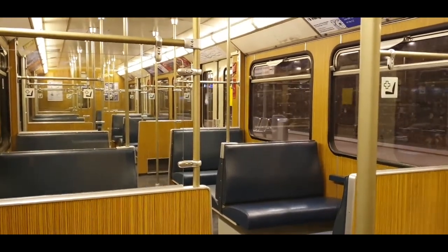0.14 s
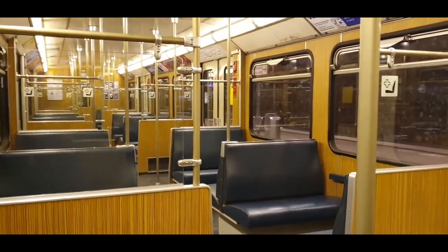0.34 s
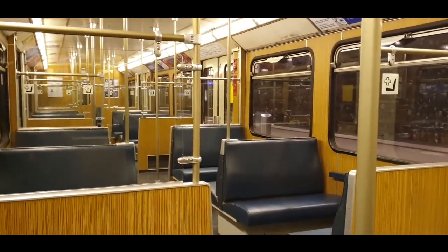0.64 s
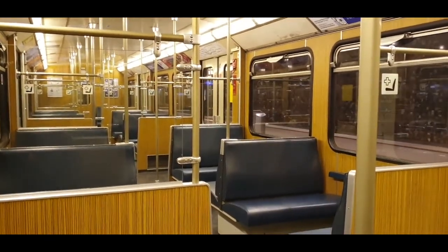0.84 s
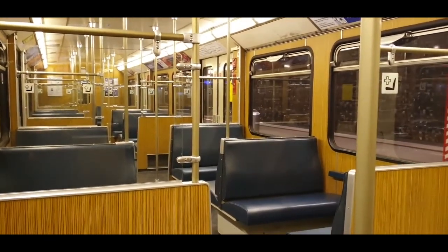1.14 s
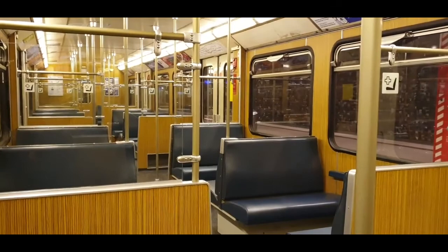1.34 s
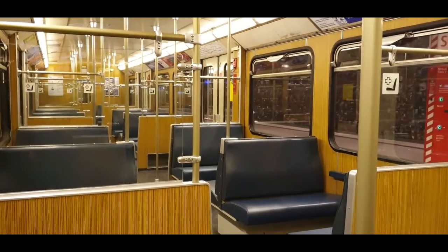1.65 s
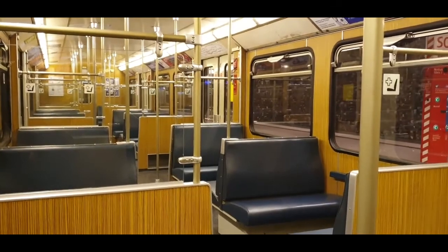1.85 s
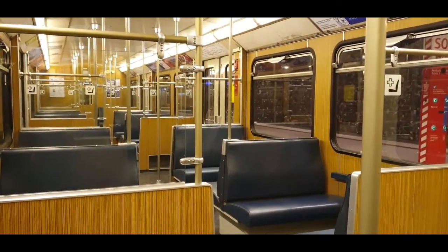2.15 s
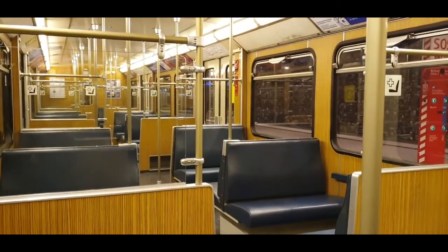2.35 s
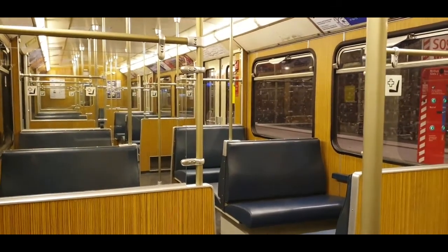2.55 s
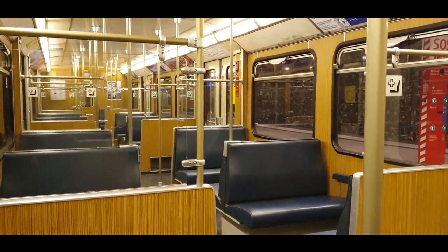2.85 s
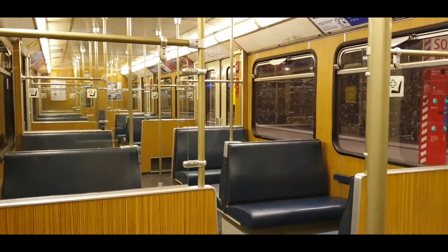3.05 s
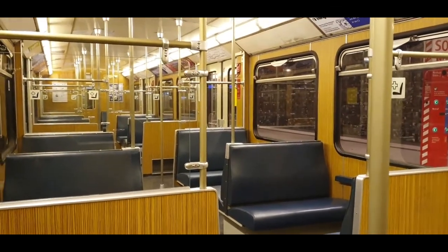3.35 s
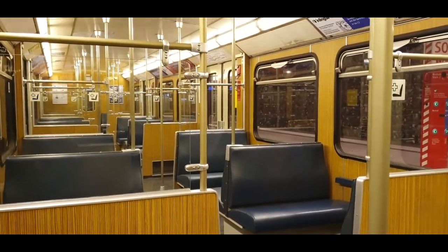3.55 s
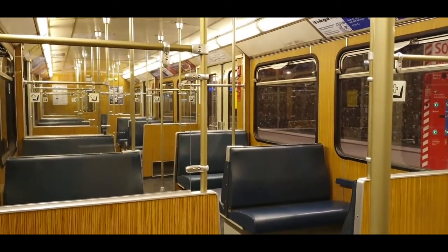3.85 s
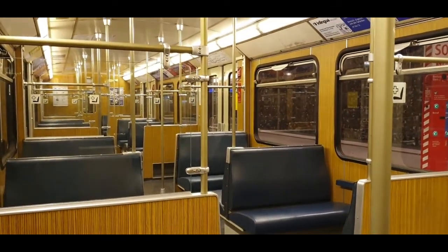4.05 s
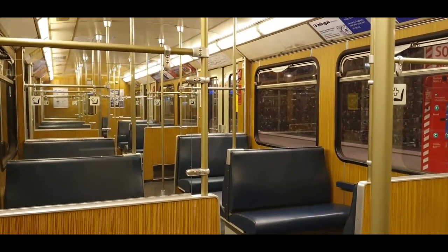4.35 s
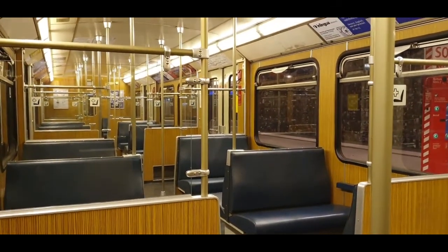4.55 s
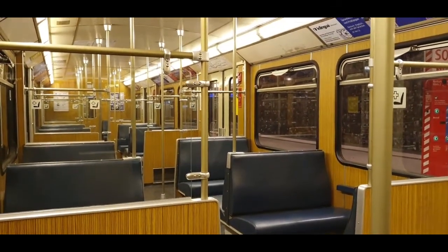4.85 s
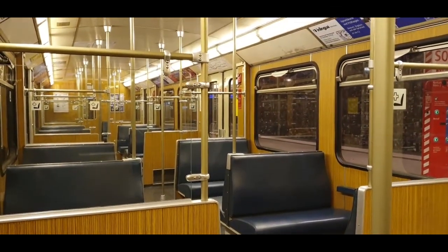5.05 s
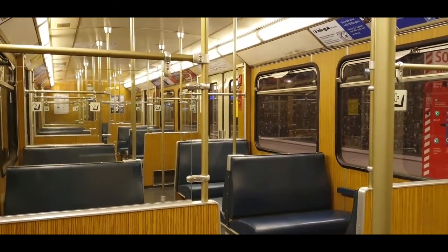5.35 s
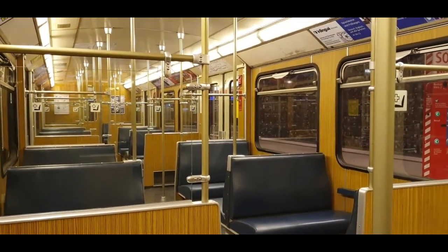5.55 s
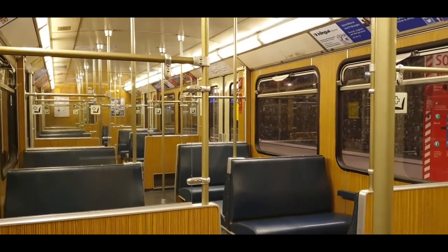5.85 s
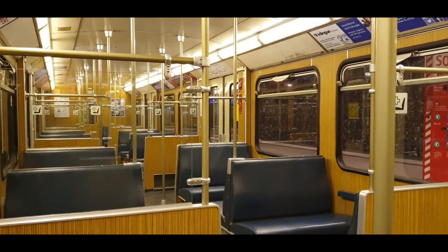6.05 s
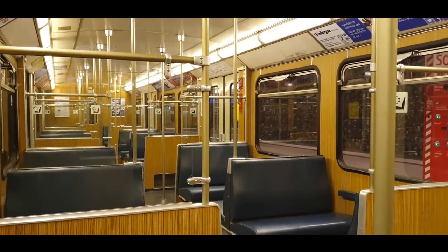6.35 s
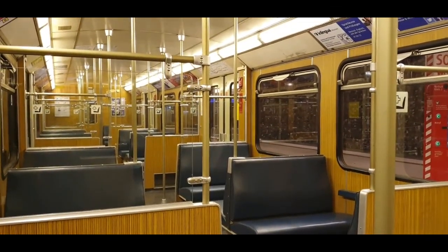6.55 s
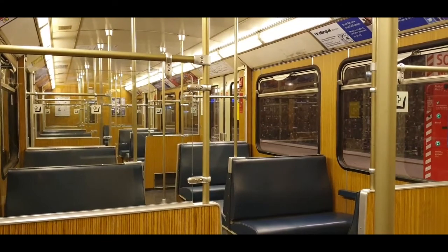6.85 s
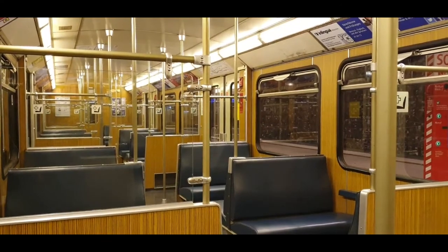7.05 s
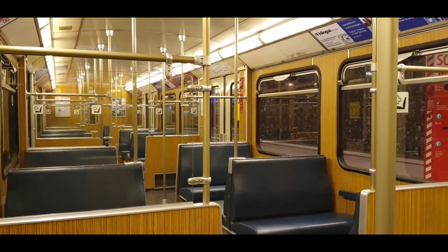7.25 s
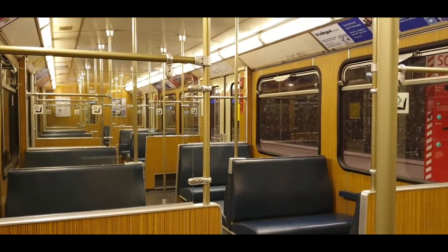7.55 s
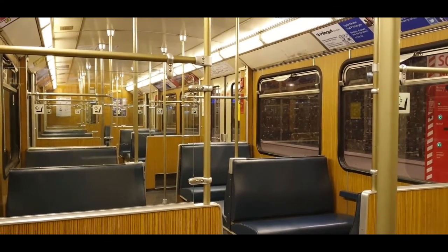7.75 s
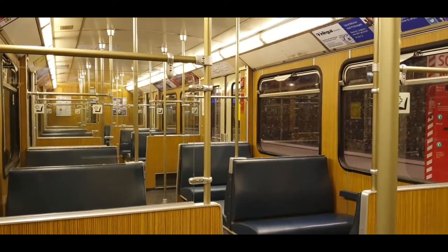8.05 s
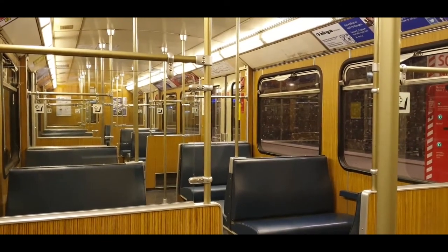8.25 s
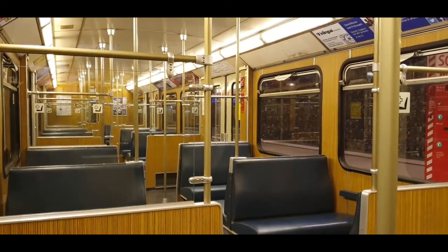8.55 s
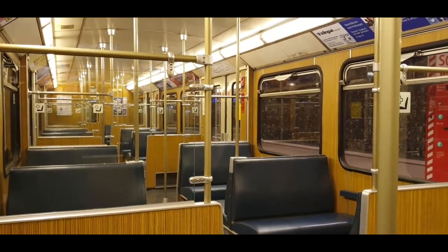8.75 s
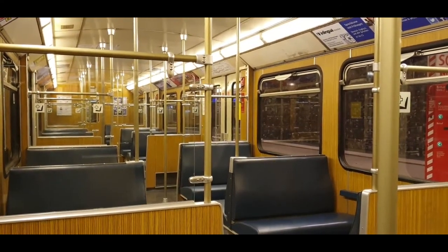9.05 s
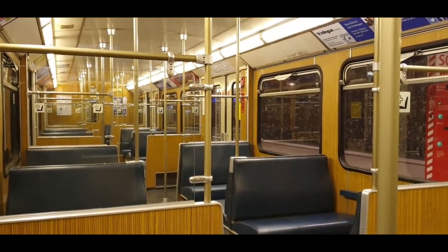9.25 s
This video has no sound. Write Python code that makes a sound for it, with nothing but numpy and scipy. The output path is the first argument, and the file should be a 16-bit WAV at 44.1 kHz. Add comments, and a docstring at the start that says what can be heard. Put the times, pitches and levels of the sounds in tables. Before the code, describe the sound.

Close stereo interior of a train car stopping: low body thuds and brief valve puffs, then a high steady brake squeal with a fainter wandering one above. A loud, short release of compressed air with hard knocks ends the squeal. Afterwards only the nearly constant electric hum remains, briefly subdued, joined midway by airy duct hiss and at the very end by a soft puff of air.

```python
"""Inside a metro car at the end of its creep to a halt: shaft orders and fan tones hum over a filtered-noise wash.
Bumps (noise bands), short brake notes (sines) and valve puffs (noise bursts) start within the first fifth of
a second; wavering squeals follow. At 2.1 s the brake air, dulling noise, blows off amid knocks and a clunk.
Gain control ducks loud moments and recovers late. A faint clunk comes at 3.8 s, the duct hiss, quiet since 1.5 s,
is back by 5.4 s, and a last puff comes at 9.3 s. Two unlike microphone ports hear it all."""
import sys
import numpy as np
from scipy import signal
from scipy.fft import rfft, irfft, next_fast_len
from scipy.io import wavfile
from scipy.ndimage import uniform_filter1d, minimum_filter1d

SR = 44100
rng = np.random.default_rng(int(sys.argv[2]) if len(sys.argv) > 2 else 0)


def voltage_ratio(decibels):
    """Convert decibels (scalar or array-like) to amplitude ratios, 20 dB per decade."""
    exponent = np.asarray(decibels, float) / 20
    return 10 ** exponent


def output_pcm(signal):
    """Save a mono or channel-first signal as 16-bit PCM at the path in sys.argv[1].

    Samples are clipped to [-1, 1] before scaling.
    """
    pcm = np.clip(np.atleast_2d(signal).T, -1, 1) * 32767
    wavfile.write(sys.argv[1], SR, np.round(pcm).astype(np.int16))


N = 414099
T = np.arange(N) / SR  # s

# Sixth order of the motor shaft: t/s, f/Hz
SIXTH_ORDER = [(0, 166.2), (3.7, 166.9), (5.2, 166.9), (6.0, 166.5), (6.7, 166.7), (7.2, 167.5),
               (8.3, 168.1), (9.4, 167.9)]
# Running levels, added to the source tables: t/s, motor level/dB, ventilation and rolling level/dB
RUNNING_LEVELS = [(0, 0.5, -1), (.6, 2, -.6), (1.5, 0.2, -3), (2.8, 2.5, 1), (4.0, 1.5, 0.1),
                  (5.2, 0.4, -0.6), (9.4, 0, 0)]
# Multiples of the shaft rate that are heard: order
SHAFT_ORDERS = [1, 2, 3, 4, 6, 7, 8, 9, 10, 11, 12, 13, 14, 18, 25, 26, 28]
# One row per order, levels as at 7 s: left level/dB, right level/dB, left lead/rad, waver/dB rms, growth/(dB/s)
ORDER_TONES = [(-57, -52, .1, -2, -0.5), (-51.5, -51.5, .2, 0.5, -2), (-36, -35, 0.25, 1.5, 0.34),
               (-45, -48.5, 0.24, 1, 0.4), (-34, -33.5, 0.19, 0.86, 0), (-56.5, -60, 0.75, -3.5, -0.5),
               (-55, -59, 0.71, -0.5, 2), (-76.5, -61.5, 0.58, 6, -1.5), (-54.5, -61, 0.97, 1.5, 2),
               (-55, -55.5, 0.93, 1.5, 2), (-59, -51.5, 1.9, 1, -1.03), (-48.5, -48, 0.2, 3, 1),
               (-66, -68, 0.75, 5.5, 4), (-70, -63, 0.83, 1, -1), (-67, -56, 3.2, 2, 0.4),
               (-69, -57, 1.1, 1, 0.5), (-83.5, -60, 4.5, 1, 1.5)]
# Change of orders 12 and 13 until the air is let off: order 12 level/dB, order 13 level/dB
BRAKED_ORDERS = (5.5, -5)
# Fan tones, levels as at 7 s: f/Hz, left level/dB, right level/dB, left lead/rad, waver/dB rms, growth/(dB/s)
FAN = [(51.1, -55, -49.5, .2, 5, 2.5), (103, -60, -54, .3, 4, 0), (152.5, -49, -52.5, 0.29, 3, 0),
       (287, -39.5, -48, 2.28, 2.5, 1.5), (373, -51, -51.5, 0.55, 2, 0.7)]
# Spectrum of the ventilation and rolling wash: f/Hz, level/(dB per Hz)
WASH_SPECTRUM = [(20, -97), (32, -86), (42, -61), (55, -53.5), (100, -61), (200, -67), (290, -66),
                 (330, -67), (372, -67.5), (430, -68.5), (550, -78), (800, -76), (1500, -77), (3000, -86),
                 (4000, -92), (7000, -100), (12000, -103), (16000, -114)]
# Fuzzy low resonance of the wash: f/Hz, width/Hz, level/dB
DRONE = (367, 38, -49.5)
# Faint whistle in the wash: f/Hz, width/Hz, level/dB
WHISTLE = (11350, 240, -75)
# Resonances of the hissing ducts: f/Hz, width/Hz, level/dB
DUCT_RESONANCES = [(5020, 550, -70), (5600, 4800, -72.5)]
# Duct hiss, loud, then quiet, then back, on top of its resonance levels: t/s, level/dB
HISS_LEVEL = [(0, 7), (.6, 1), (1.5, -27), (4.6, -27), (5.2, -5.5), (5.4, 10), (7.3, -2.5), (8.3, 2),
              (9.4, 2)]
# How alike the two ports hear the car: f/Hz, likeness/(0 to 1), left lead/rad
PORT_LIKENESS = [(60, 1, 0.4), (150, 1, 0.28), (304, 0.85, 0.31), (630, 0.6, 0.88), (1050, 0.19, 1.02),
                 (1450, 0.37, 3.77), (2286, 0.45, 5.8), (3040, 0, 15.9), (15000, 0.04, 10.4)]

# Bumps through the body: t/s, level/dB, hardness/(dB per octave)
BODY_BUMPS = [(.06, -31, -0.5), (.21, -28, 1), (.42, -30, -3), (.59, -27.5, 1), (.69, -26, 0),
              (.84, -29, -2.5), (.96, -26, -2), (1.04, -32, 0.5), (1.2, -42, -5), (1.39, -55, 6.5),
              (2.086, -24.5, 6.5), (2.14, -25, -2), (2.27, -24, 1.5), (2.35, -22.5, 3), (2.414, -21, 3),
              (2.445, -24, 1)]
# What the car body rings with: f/Hz, width/octaves, level/dB, rise/s, t60/s
BODY_BANDS = [(74, 0.39, -0.5, 0.03, 0.86), (144, 0.4, -4, 0.04, 0.37), (248, 0.29, -7.5, 0.022, 0.38),
              (468, 0.37, -14, .02, 0.48)]
# Short upper notes of the brake block, before each port's trim: t/s, level/dB
SHORT_NOTES = [(.06, -50.5), (.6, -54), (.73, -53), (.86, -56), (.98, -56)]
CHIRP_HZ, CHIRP_S = 2570, 0.025  # the length is one standard deviation of the bell
# Sharp puffs from valves: t/s, t60/s, level/dB, centre f/Hz, width/octaves
VALVE_PUFFS = [(.155, .34, -34.5, 1080, .65), (0.154, 0.72, -35, 3400, .85),
               (.288, 0.55, -41.5, 10000, 3.1), (0.659, .7, -52.5, 5050, .33),
               (9.269, 6.1, -42, 1900, 0.72)]
PUFF_RISE_S = 0.0041
# Soft swells of hiss: t/s, rise/s, level/dB, centre f/Hz
HISS_SWELLS = [(.42, .1, -54, 11200), (2.53, 0.052, -49.5, 12100), (2.78, 0.16, -52.5, 12000),
               (8.42, 0.24, -52.5, 12600)]
SIGH_OCTAVES, SIGH_T60_S = 0.7, 0.64
# Fainter, wandering note of a brake block, before each port's trim: t/s, f/Hz, level/dB
WANDERING_NOTE = [(.3, 2460, -66), (.45, 2446, -57), (.57, 2370, -58), (.62, 2370, -73), (1.0, 2477, -62),
                  (1.15, 2390, -59), (1.35, 2410, -56), (1.6, 2480, -59), (1.8, 2463, -65),
                  (2.09, 2620, -57)]
# Brake block that settles on one note, before each port's trim: t/s, f/Hz, level/dB
SETTLING_NOTE = [(.45, 1494, -60), (.68, 1533, -54), (.73, 1612, -55.5), (.9, 1616, -50.5),
                 (.95, 1620, -46), (1.4, 1603, -46.5), (1.57, 1615, -50.5), (2.09, 1617, -48.5)]

# Brake air: opens, holds, sags as the pressure drops, and dies away once shut
OPEN_S, RISE_S, HOLD_S, SHUT_S = 2.084, 0.019, 0.1, 2.51
JET_DB, SAG_DB_PER_S, TAIL_DB_PER_S = -12.5, 43.5, 89
BRIGHT_DB, DULLING, DULLEST_DB = 1, 0.87, -7.5  # dB moved from dull to bright; lost per dB of sag; the limit
# Relative spectrum of the air jet: f/Hz, level/dB
JET_SPECTRUM = [(100, 8), (300, -2), (600, -3.5), (1500, -0.5), (4000, 1.5), (8000, -4), (11500, -1),
                (16000, 0.5)]
# Knocks on the valve: t/s, level/dB, hardness/(dB per octave)
VALVE_KNOCKS = [(2.091, -9.5, -3), (2.149, -14, 2), (2.4135, -11.5, 3.5)]
# Short rings of the valve and its mounting: f/Hz, level/dB, t60/s
VALVE_RINGS = [(61, -4, .15), (130, -1, 0.099), (327, -9, 0.047), (740, -11, 0.036), (1900, -17, .018),
               (2670, -6.5, 0.023), (3150, -14, .018), (6410, -17, .012)]
KNOCK_RISE_S = 0.0037
# Clunks of the brake gear: t/s, level/dB, hardness/(dB per octave)
GEAR_CLUNKS = [(2.414, -11, -1), (2.448, -13.5, -1.5), (3.836, -33, -12), (3.858, -34, -12)]
# What the brake gear rings with: f/Hz, width/octaves, level/dB, rise/s, t60/s
GEAR_BANDS = [(596, .6, -9, .004, 0.24), (940, .3, -14, .01, 0.51), (1844, 1.23, -12, 0.0066, 1),
              (2770, 0.62, -7, 0.0033, 0.58), (11600, 0.17, 0.5, 0.0017, 0.1)]

# Colour of the left port: f/Hz, level/dB
LEFT_COLOUR = [(20, 0.5), (200, -3), (380, -1), (700, -2), (2500, -6), (5000, -8.5), (7000, -3.5),
               (7900, -9), (8250, -14), (8500, -1), (11500, -13), (13500, -14), (15600, -15), (16000, -45)]
# Colour of the right port, in a cavity with two peaks and a notch: f/Hz, level/dB
RIGHT_COLOUR = [(1000, -0.5), (2600, 1.5), (3300, 1.5), (3900, -5.5), (4500, -1.5), (5300, 2), (6900, 12),
                (7700, 2.5), (8300, -27), (8700, 1), (9700, -0.5), (11600, 4.5), (13000, -1.5), (15600, -7),
                (16000, -45)]


def read(points, hz, axis=1):
    """One column of a spectrum, joined on a log-frequency axis."""
    table = np.transpose(points)
    return np.interp(np.log(hz + 1), np.log(table[0] + 1), table[axis])


def curves(rows):
    """The columns of a timed table, joined by straight lines at every sample."""
    s, *columns = np.transpose(rows)
    return [np.interp(T, s, column) for column in columns]


def evened(x):
    """Scales a sound to rms 1."""
    return x / np.sqrt(np.mean(x ** 2) + 1e-20)


def colour(x, gain):
    """Filters by a gain given as a function of Hz."""
    length = x.shape[-1]
    size = next_fast_len(length)
    spectrum = rfft(x, size) * gain(np.fft.rfftfreq(size, 1 / SR))
    return irfft(spectrum, size)[..., :length]


def drift(top_hz, low_hz=0.0934):
    """Irregular movement of rms 1: twenty sines of chance phase, the slower ones stronger."""
    f, t = np.geomspace(low_hz, top_hz, 20), T[::256]
    waves = np.sin(2 * np.pi * (t[:, None] * f + rng.random(len(f))))
    return np.interp(T, t, evened(waves @ (1 / np.sqrt(f))))


def diffuse():
    """White noise from all round the car: bass alike at both ports, treble nearly unrelated."""
    right, other = rng.standard_normal((2, N))

    def likeness(hz):
        return np.clip(read(PORT_LIKENESS, hz), 0, 1)

    shared = colour(right, lambda hz: likeness(hz) * np.exp(1j * read(PORT_LIKENESS, hz, axis=2)))
    unshared = colour(other, lambda hz: np.sqrt(1 - likeness(hz) ** 2))
    return np.array([shared + unshared, right])


def tone(turns, left_db, right_db, lead, waver_db, growth):
    """A sine that wavers in level as the car's echoes shift; growth is counted from the seventh second."""
    phase = 2 * np.pi * (turns + rng.random())
    pair = np.array([voltage_ratio(left_db) * np.sin(phase + lead), voltage_ratio(right_db) * np.sin(phase)])
    level_db = waver_db * drift(9, low_hz=0.6) + growth * (T - 7)
    return np.sqrt(2) * voltage_ratio(level_db) * pair  # levels are rms


def motor(level_db):
    """Whole orders locked to one turning shaft, and the fixed tones of a fan."""
    shaft_turns = np.cumsum(curves(SIXTH_ORDER)[0]) / SR / 6
    braked_db = dict(zip((12, 13), BRAKED_ORDERS))
    hum = np.zeros((2, N))
    for order, row in zip(SHAFT_ORDERS, ORDER_TONES):
        change_db = braked_db.get(order, 0) * (T < OPEN_S)
        hum += voltage_ratio(change_db) * tone(order * shaft_turns, *row)
    fan = sum(tone(hz * T, *row) for hz, *row in FAN)
    return voltage_ratio(level_db) * (hum + fan)


def ridge(white, centre_hz, width_hz, db):
    """Noise narrowed to the peak of one resonance."""
    return voltage_ratio(db) * evened(colour(white, lambda hz: 1 / (1 + (2 * (hz - centre_hz) / width_hz) ** 2)))


def ventilation(wash_db, hiss_db):
    """A broad wash with a drone and a faint whistle, and duct resonances that hiss above it."""
    wash = colour(diffuse(), lambda hz: voltage_ratio(read(WASH_SPECTRUM, hz)) * np.sqrt(SR / 2))
    white = diffuse()
    wash += ridge(white, *WHISTLE) + ridge(white, *DRONE)
    hiss = sum(ridge(white, *row) for row in DUCT_RESONANCES)
    wash_level = voltage_ratio(wash_db + 0.59 * drift(5))
    hiss_level = voltage_ratio(wash_db + hiss_db + 0.9 * drift(18))
    return wash_level * wash + hiss_level * hiss


def bursts(rows):
    """Each row (t/s, rise/s, t60/s, level/dB, f/Hz, width/octaves) is a band of noise that swells and dies."""
    white, out = diffuse(), np.zeros((2, N))
    skips = rng.integers(0, N // 2, len(rows))  # each burst takes its own stretch of noise
    for (s, rise, t60, db, centre_hz, octaves), skip in zip(rows, skips):
        at = round(s * SR)
        t = T[:min(round((rise + t60) * SR), N - at)]
        band = colour(white[:, skip:skip + len(t)],
                      lambda hz: np.exp(-0.5 * (np.log2((hz + 1) / centre_hz) / octaves) ** 2))
        swell = np.sin(np.pi / 2 * np.minimum(t / rise, 1)) ** 2
        shape = swell * voltage_ratio(-60 * np.maximum(t - rise, 0) / t60)
        out[:, at:at + len(t)] += voltage_ratio(db) * evened(band * shape) * np.sqrt(np.mean(shape ** 2))
    return out


def struck(blows, bands):
    """Every blow sounds all bands of the object; harder blows favour the upper ones."""
    rows = []
    for s, db, hard in blows:
        for hz, octaves, band_db, rise, t60 in bands:
            hardness_db = hard * np.log2(hz / bands[0][0])
            rows.append((s, rise, t60, db + band_db + hardness_db, hz, octaves))
    return bursts(rows)


def bumps():
    """Jolts ring the broad low resonances of the car body."""
    return struck(BODY_BUMPS, BODY_BANDS)


def squeal(hz, level, unsteady_hz):
    """A brake block sings: a sine with fluttering level and unsteady pitch."""
    flutter = level * voltage_ratio(1.9 * drift(39.7, low_hz=6))
    turns = np.cumsum(hz + unsteady_hz * drift(60, low_hz=5)) / SR
    return flutter * tone(turns, -0.43, 2.1, 2.23, 0.42, 0)


def chirps():
    """Brief notes of the brake block that rise and fall in a bell shape."""
    level = sum(voltage_ratio(db) * np.exp(-0.5 * ((T - s) / CHIRP_S) ** 2) for s, db in SHORT_NOTES)
    return squeal(CHIRP_HZ, level, unsteady_hz=30)


def air():
    """Puffs and sighs of the air system: noise bands with sharp or soft onsets."""
    puffs = [(s, PUFF_RISE_S, *rest) for s, *rest in VALVE_PUFFS]
    sighs = [(s, rise, SIGH_T60_S, db, hz, SIGH_OCTAVES) for s, rise, db, hz in HISS_SWELLS]
    return bursts(puffs + sighs)


def held(rows, unsteady_hz):
    """A squeal that follows a table from its first row to its last."""
    hz, db = curves(rows)
    sounding = (T > rows[0][0]) * (T < rows[-1][0])
    return squeal(hz, voltage_ratio(db) * sounding, unsteady_hz)


def brake_notes():
    """The long notes of rubbing brake blocks: one wanders, one settles in pitch."""
    return held(WANDERING_NOTE, unsteady_hz=32) + held(SETTLING_NOTE, unsteady_hz=4.4)


def blast():
    """Turbulent air from the brake valve; it dulls as the pressure sags."""
    sag_db = SAG_DB_PER_S * np.clip(T - OPEN_S - RISE_S - HOLD_S, 0, None)
    tail_db = TAIL_DB_PER_S * np.clip(T - SHUT_S, 0, None)
    tilt_db = np.maximum(BRIGHT_DB - DULLING * sag_db, DULLEST_DB)
    opening = np.clip((T - OPEN_S) / RISE_S, 0, 1)
    open_sag_db = np.minimum(sag_db, np.interp(SHUT_S, T, sag_db))  # no further sag once shut
    level = opening * voltage_ratio(JET_DB - open_sag_db - tail_db)
    jet = evened(colour(diffuse(), lambda hz: voltage_ratio(read(JET_SPECTRUM, hz))))
    dull = colour(jet, lambda hz: 1 / np.sqrt(1 + (hz / 3500) ** 2))
    bright = jet - dull
    return level * voltage_ratio(1.3 * drift(45.7)) * (voltage_ratio(-tilt_db) * dull + voltage_ratio(tilt_db) * bright)


def knocks():
    """Each knock sets the decaying sine rings of the valve and its mounting going at once."""
    out, t = np.zeros((2, N)), T[:SR // 4]
    for s, db, hard in VALVE_KNOCKS:
        at = round(s * SR)
        for hz, ring_db, t60 in VALVE_RINGS:
            lead = np.array([[read(PORT_LIKENESS, hz, axis=2)], [0]])
            hardness_db = hard * np.log2(hz / VALVE_RINGS[0][0])
            level = voltage_ratio(db + ring_db + hardness_db - 60 * t / t60)
            onset = np.minimum(t / KNOCK_RISE_S, 1)
            out[:, at:at + len(t)] += level * onset * np.sin(2 * np.pi * hz * t + lead)
    return out


def clunks():
    """Blows ring the broad resonances of the brake gear."""
    return struck(GEAR_CLUNKS, GEAR_BANDS)


def scene():
    """Everything in the car, as it reaches the two ports."""
    motor_db, wash_db = curves(RUNNING_LEVELS)
    running = motor(motor_db) + ventilation(wash_db, curves(HISS_LEVEL)[0])
    brakes = chirps() + brake_notes() + blast() + knocks() + clunks()
    return running + bumps() + air() + brakes


def band_limit(x):
    """A steep low-pass at the top of the band."""
    return signal.sosfilt(signal.butter(12, 16250, fs=SR, output="sos"), x)


def record(dry):
    """Port colours, microphone hiss, and gain control that holds before it recovers."""
    ports = np.array([colour(x, lambda hz: voltage_ratio(read(port, hz)))
                      for x, port in zip(dry, (LEFT_COLOUR, RIGHT_COLOUR))])
    ports += voltage_ratio(-62) * colour(rng.standard_normal((2, N)), lambda hz: 1 / (1 + (hz / 10500) ** 4))
    power_db = 10 * np.log10(uniform_filter1d((ports ** 2).mean(0), size=4096) + 1e-12)
    cut_db = np.clip(1.1 * (power_db + 23.0), 0, 5.5)
    hold = round(1.0 * SR)  # the deepest cut stays for twice this long
    held_db = -minimum_filter1d(np.concatenate([np.zeros(hold), -cut_db]), 2 * hold + 1)[:N]
    recovery_db = 6.5 * T  # dB a second, once the hold is over
    gain_db = -uniform_filter1d(np.maximum.accumulate(held_db + recovery_db) - recovery_db, size=2048)
    return band_limit(ports * voltage_ratio(gain_db))


dry = scene()
out = record(dry)
output_pcm(out)
```